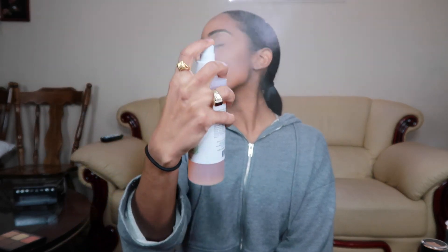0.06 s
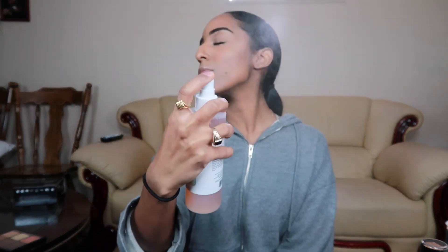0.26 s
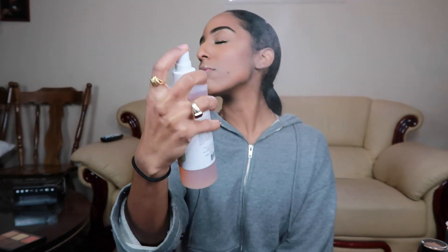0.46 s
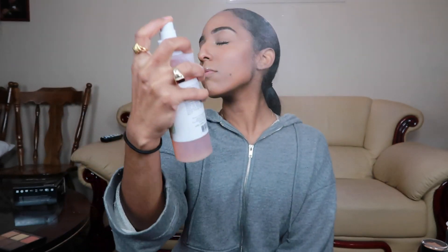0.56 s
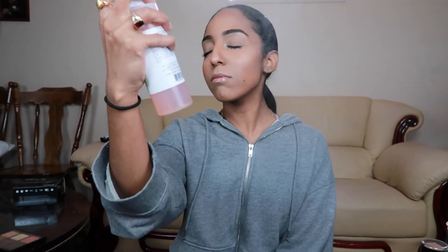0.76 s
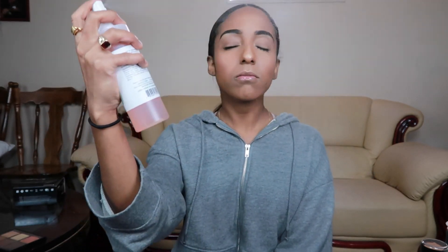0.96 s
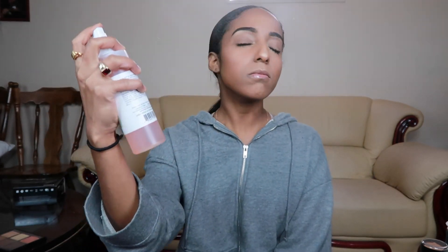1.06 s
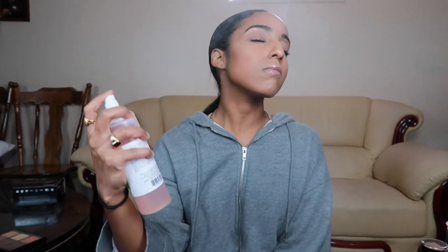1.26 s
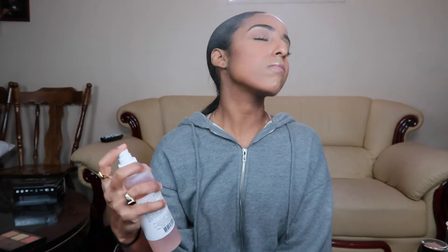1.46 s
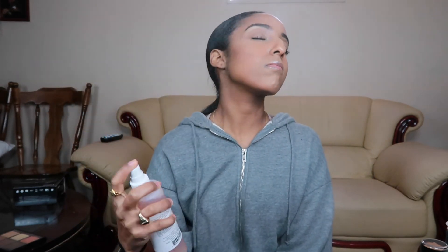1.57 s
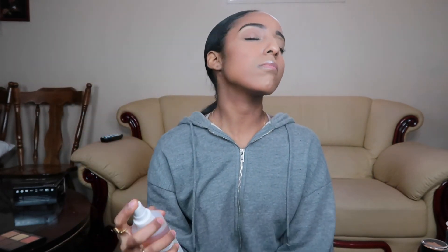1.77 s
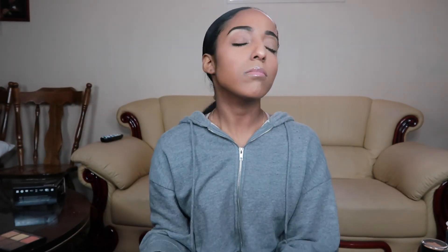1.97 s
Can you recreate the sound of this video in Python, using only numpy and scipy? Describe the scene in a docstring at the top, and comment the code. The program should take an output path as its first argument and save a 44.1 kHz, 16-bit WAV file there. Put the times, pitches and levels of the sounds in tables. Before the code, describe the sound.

Quick repeated pumps of a small spray bottle, clicking and hissing softly in a quiet furnished room

```python
"""Seven presses of a pump bottle

A small plastic pump bottle is pressed seven times, an arm's length from a stereo microphone in a quiet furnished room.
Each press: slack taken up with a tick (ringing modes), a valve snap (sine burst with bounces), a nozzle hiss (droplet
clicks and fine noise); on release the head ticks back and faint bubbles (gliding narrow noise) refill the chamber.
The room answers with a short diffuse tail, over noise, rumble and a low hum made of filtered noise."""
import sys
import numpy as np
from scipy import signal
from scipy.fft import rfft, irfft
from scipy.io import wavfile

SR = 44100
rng = np.random.default_rng(int(sys.argv[2]) if len(sys.argv) > 2 else 0)


def persist_wave(psi):
    """Save psi, clipped to +-1, as 16-bit WAV."""
    counts = np.round(np.clip(psi, -1, 1) * 32767).astype(np.int16)
    wavfile.write(sys.argv[1], SR, np.atleast_2d(counts).T)


N = 88200
LEAD = SR // 10  # samples of run-in, dropped at the end
M = N + LEAD

# Colour of the loose-part rattle after snaps and ticks. Each row: frequency in Hz, relative level in dB.
RATTLE_COLOUR = [(400, -30), (900, -10), (1500, 0), (2250, -3), (3000, -5.5), (4500, -10), (5600, -11.5),
                 (6500, -30.5)]


def amp(db):
    """dB to gain."""
    return 10 ** (np.asarray(db) / 20)


def rms_one(x):
    """Scale to rms 1."""
    return x / np.sqrt(np.mean(x ** 2) + 1e-20)


def at_hz(points, size):
    """A (Hz, value) table read on the FFT grid, interpolated over log frequency."""
    hz, value = np.transpose(points)
    grid_hz = np.fft.rfftfreq(size, 1 / SR) + 1
    return np.interp(np.log(grid_hz), np.log(hz), value)


def colour(x, spectrum):
    """Shape by a spectrum in dB; rms 1."""
    size = x.shape[-1]
    return rms_one(irfft(rfft(x) * amp(at_hz(spectrum, size)), size))


def diffuse(size, likeness):
    """Stereo white noise whose left-right likeness follows a table over frequency, held within -1 to 1."""
    mid, side = rfft(rng.standard_normal((2, size)))
    alike = np.clip(at_hz(likeness, size), -1, 1)
    shared = np.sqrt(1 + alike) * mid
    opposed = np.sqrt(1 - alike) * side * [[1], [-1]]
    return irfft((shared + opposed) / np.sqrt(2), size)


def drift(rate):
    """Smooth chance wavering, low-passed twice at a rate in Hz; rms 1."""
    r = np.exp(-2 * np.pi * rate / SR)
    slow = signal.lfilter([1], [1, -2 * r, r * r], rng.standard_normal(M + SR))
    return rms_one(slow[SR:])


def cut(x, hz, kind):
    """Steep low- or high-pass."""
    return signal.sosfilt(signal.butter(6, np.clip(hz, 20, 20000), kind, fs=SR, output="sos"), x)


def pan(db):
    """Left and right gains for a left-over-right difference in dB."""
    return amp([[db / 2], [-db / 2]])


def ring(clicks, hz, t60):
    """A unit click sets a sine of height 1 ringing, 60 dB down after t60 seconds."""
    r, w = amp(-60 / (t60 * SR)), 2 * np.pi * hz / SR
    return signal.lfilter([0, np.sin(w)], [1, -2 * r * np.cos(w), r * r], clicks + 1e-18)


def strike(click, modes):
    """A click excites every mode of a table at once."""
    return sum(amp(db) * ring(click, hz, t60) for hz, db, t60 in modes)


def resonance(x, hz, width_hz):
    """Noise narrowed twice round a pitch; rms 1."""
    r = np.exp(-np.pi * width_hz / SR)
    a = [1, -2 * r * np.cos(2 * np.pi * hz / SR), r * r]
    once = signal.lfilter([1, 0, -1], a, x)
    return rms_one(signal.lfilter([1, 0, -1], a, once))


def add(out, s, sound):
    """Mix a sound in at a time in seconds."""
    i = LEAD + int(s * SR)
    out[:, i:i + sound.shape[-1]] += sound[:, :M - i]


def background():
    """Room and microphone noise, a wandering rumble and a wavering hum; all sink a little at the end."""
    # The hum's pitches. Each row: frequency in Hz, rms level in dB.
    hum_tones = [(242.2, -70.5), (371.4, -74.5)]
    # Colour of the noise floor. Each row: frequency in Hz, relative level in dB.
    floor_colour = [(42, -15.5), (55, -5.5), (120, -9.5), (180, -3), (450, -2), (700, -12.5), (1000, -11),
                    (1450, -19), (2050, -15), (2800, -23), (3800, -21.5), (5000, -30.5), (6500, -31.5),
                    (15700, -49.5)]
    # Stereo image of the floor. Each row: frequency in Hz, left-right likeness (no unit).
    floor_likeness = [(60, 1.0), (380, 0.88), (950, 0.63), (2380, 0.15), (5980, -0.52), (15000, -0.72)]
    # Colour of the rumble. Each row: frequency in Hz, relative level in dB.
    rumble_colour = [(30, -31.5), (55, 4), (110, 2), (180, 6), (320, -41)]
    # Course of the rumble before it wanders. Each row: time in seconds, level in dB.
    rumble_course = [(0.0, -77), (0.3, -66.5), (0.64, -71), (1.05, -75.5), (1.15, -68), (1.6, -75.5),
                     (2.0, -70.5)]
    floor_db, floor_wander_db = -65.5, 1.2
    rumble_wander_db, wander_hz = 3.5, 6.0
    fade_from_s, fade_db_per_s = 1.61, -9.5

    t = (np.arange(M) - LEAD) / SR
    # a narrow resonance, 13 Hz wide in each pass, makes noise waver like a hum
    hum = sum(amp(db) * resonance(rng.standard_normal(M), hz, 13) for hz, db in hum_tones)
    wander = drift(wander_hz)  # shared by floor and rumble
    floor = amp(floor_db + floor_wander_db * wander) * colour(diffuse(M, floor_likeness), floor_colour)
    rumble_db = np.interp(t, *np.transpose(rumble_course)) + rumble_wander_db * wander
    rumble = amp(rumble_db) * colour(rng.standard_normal(M), rumble_colour)
    return (floor + hum + rumble) * amp(fade_db_per_s * np.maximum(t - fade_from_s, 0))


def flow(start, swell, end, shut):
    """Flow swells, holds until the shutting time, then drops to a dribble; if shut before the start, only
    a fading dribble is heard."""
    dribble_db, dribble_s = -9, 0.019
    t = (np.arange(M) - LEAD) / SR
    after = np.maximum(t - end, 0)
    closing = np.exp(-after / shut)
    dribble = amp(dribble_db) * np.exp(-after / dribble_s)
    rise = np.clip((t - start) / swell, 0, 1) ** 0.88
    return rise * np.maximum(closing, dribble)


def spray():
    """Dense, slightly uneven droplets give the jet; a finer, wider hiss hangs on a little longer."""
    # Spurts through the nozzle. Each row: start in seconds, swell in seconds, shutting time in seconds,
    # jet level in dB, mist level in dB, jet left over right in dB.
    spurts = [(-.06, 0.004, -0.031, -29.5, -43, -4), (.152, .002, 0.17, -66, -66, -1),
              (.163, 0.006, 0.19, -35.5, -51, -0.5), (.368, 0.002, .391, -44, -59, -1),
              (0.389, 0.0086, 0.42, -34, -51, -0.5), (.441, 0.0054, .447, -47.5, -66, 2),
              (0.594, 0.0037, 0.67, -55, -69, 3.5), (0.614, 0.011, 0.64, -31.5, -48.5, 0),
              (0.812, 0.0021, 0.81, -21.5, -48, 1.2), (0.827, 0.0044, 0.86, -32.5, -50.5, -0.1),
              (.884, .003, .892, -52, -69, .6), (1.043, .003, 1.069, -38, -55, .9),
              (1.062, .008, 1.0965, -34.5, -54, .9), (1.1165, .005, 1.127, -37.5, -58, .6),
              (1.28, 0.0021, 1.255, -35, -48, -12), (1.302, 0.0028, 1.325, -35.5, -51.5, 1.7),
              (1.356, .004, 1.3645, -48, -67, .9), (1.537, 0.018, 1.561, -35, -51.5, 2)]
    # Colour of the droplet jet. Each row: frequency in Hz, relative level in dB.
    jet_colour = [(290, -67), (600, -30), (1740, -0.5), (2670, 2), (3720, 0.5), (4610, -5), (5460, -7),
                  (7500, -19), (9300, -51.5)]
    # Colour of the fine mist. Each row: frequency in Hz, relative level in dB.
    mist_colour = [(6000, -5.5), (7650, -3.5), (9400, -2.5), (11000, -8), (13000, -4.5), (15600, -16.5)]
    drops_per_s, drop_spread_db = 5100, 0.5
    sputter_db, mist_flicker_db, sputter_hz = 1.3, 1.5, 110
    jet_shut_s, mist_shut_s, mist_lag_s = .002, 0.0089, 0.005
    mist_width = 0.78  # side over mid

    sizes = amp(drop_spread_db * np.minimum(rng.exponential(1, M), 4)) * rng.choice([-1, 1], M)
    drops = sizes * (rng.random(M) < drops_per_s / SR)
    drops = colour(drops, [(200, -44.5)] + jet_colour + [(9500, -58.5)])
    sputter = amp(sputter_db * drift(sputter_hz))

    mid, side = colour(rng.standard_normal((2, M)), [(4500, -55.5)] + mist_colour)
    fine = mid + mist_width * side * [[1], [-1]]
    flicker = amp(mist_flicker_db * drift(sputter_hz))

    # overlapping spurts add by power
    jet_power, mist_power = 0, 0
    for start, swell, end, jet_db, mist_db, lr in spurts:
        jet_power = jet_power + (amp(jet_db) * pan(lr) * flow(start, swell, end, jet_shut_s)) ** 2
        mist_power = mist_power + (amp(mist_db) * flow(start, swell + mist_lag_s, end, mist_shut_s)) ** 2
    return sputter * np.sqrt(jet_power) * drops + flicker * np.sqrt(mist_power) * fine


def ticks():
    """Slack and return of the head: soft double taps on ringing plastic, each varied, with a faint rattle."""
    # Ticks. Each row: time in seconds, level in dB, tilt in dB per octave, upper modes in dB,
    # left over right in dB.
    taps = [(.080, -42, 6, -24, 2), (0.125, -38.5, -11, -13.5, 2), (0.303, -39, 11, -24, 1),
            (0.3533, -51, 16, -18, 8), (.356, -37.5, 22, -14, 1), (0.5295, -40, -10, -19, 1.5),
            (0.5831, -33.5, 4, -20, 2.5), (.744, -40, -7.5, -26, 3.5), (.802, -38.5, -10.5, -10.5, 3.5),
            (.976, -48, -6.5, -29.5, 5.5), (1.036, -45, 2.5, -18, 4.5), (1.212, -50.5, -5, -28, 5),
            (1.2696, -44, -6, -22, 5), (1.454, -45, 3.5, -32.5, 2), (1.4984, -35, 1, -34.5, 3),
            (1.666, -44.5, -10, -32.5, 4)]
    # Lower modes of the head, before variation. Each row: frequency in Hz, level in dB, t60 in seconds.
    low_modes = [(726, -20, 0.017), (1450, -1, 0.015), (2144, -1, 0.016), (2370, -15, 0.010)]
    # Upper modes of the head, before variation. Each row: frequency in Hz, level in dB, t60 in seconds.
    high_modes = [(3700, -12, .008), (4800, -3, 0.019), (5200, -13.5, 0.014)]
    detune, scatter_db = .02, 2.5  # spread of mode pitch (share) and level
    bounce_s, bounce_db = .0015, -5
    rattle_db, rattle_s = -20, 0.052
    thin_hz, soft_hz = 579, 2455

    def vary(modes):
        """Shift each mode a little by chance."""
        chance = rng.standard_normal((len(modes), 2))
        return [(hz * (1 + detune * a), db + scatter_db * b, t60)
                for (hz, db, t60), (a, b) in zip(modes, chance)]

    out, t = np.zeros((2, M)), np.arange(SR // 10) / SR
    click = (t == 0) + amp(bounce_db) * (np.arange(len(t)) == int(bounce_s * SR))
    for s, db, tilt_db, upper_db, lr in taps:
        upper = cut(strike(click, vary(high_modes)), 2900, "high")
        tilted = [(hz, d + tilt_db * np.log2(hz / 1700), t60) for hz, d, t60 in low_modes]
        low = cut(strike(click, vary(tilted)), thin_hz, "high")
        rattle = amp(rattle_db) * colour(rng.standard_normal(len(t)), RATTLE_COLOUR) * np.exp(-t / rattle_s)
        dull = cut(cut(low + rattle, soft_hz, "low"), soft_hz, "low")
        add(out, s, pan(lr) * amp(db) * (dull + amp(upper_db) * upper))
    return out


def bubbles():
    """As the chamber refills, each bubble is a short rough rush of noise round a gliding pitch."""
    # Bubbles. Each row: start in seconds, level in dB, pitch in Hz, length in seconds,
    # initial glide in Hz per second.
    bubble_list = [(0.094, -65, 3120, 0.0073, -3), (.097, -70, 4500, 0.0052, 0),
                   (0.306, -68.5, 5090, 0.014, -9000), (0.545, -71, 4800, 0.014, 0),
                   (0.76, -63.5, 3107, 0.01, 0), (.995, -70.5, 3100, 0.011, -2),
                   (1.168, -72.5, 5250, 0.07, -9000), (1.687, -62, 2040, 0.0095, 3005),
                   (1.700, -67.5, 2200, 0.014, 3001), (1.718, -62.5, 2570, 0.0063, 5002),
                   (1.726, -59.5, 2640, 0.016, 0), (1.768, -65, 2730, 0.015, 3001),
                   (1.826, -69, 3734, 0.019, -5000), (1.827, -68.5, 4470, 0.013, 3000.5),
                   (1.852, -79, 3810, 0.048, -2)]
    width_hz, attack_s = 340, 0.0017
    out, t = np.zeros((2, M)), np.arange(SR // 5) / SR
    r = np.exp(-np.pi * width_hz / SR)
    for s, db, hz, length, glide in bubble_list:
        # two slow noises on a cosine and a sine make a narrow band at the pitch
        a, b = signal.lfilter([1], [1, -2 * r, r * r], rng.standard_normal((2, len(t))))
        glided = glide * length * (t - length * (1 - np.exp(-t / length)))  # the glide levels off
        phase = 2 * np.pi * (hz * t + glided)
        rush = rms_one(a * np.cos(phase) + b * np.sin(phase))
        envelope = np.minimum(t / attack_s, 1) * np.exp(-(t / length) ** 2)
        add(out, s, np.ones((2, 1)) * amp(db) * rush * envelope)
    return out


def snaps():
    """The head sings a few cycles until the valve seats, bounces twice and rattles out."""
    # Valve snaps. Each row: time in seconds, level in dB, head pitch in Hz, left over right in dB,
    # hold in seconds, body modes in dB, upper modes in dB, bounces and rattle in dB.
    snap_list = [(0.132, -17, 2183, 0.5, 0.0019, -7.5, 1.5, 2),
                 (0.3635, -13, 2320, 0, 0.0019, -1, -11, -1.5), (0.5912, -16.5, 2263, 0, 0.0019, 5, 2, 1),
                 (0.809, -17.5, 2305, 1.2, 0.0018, -1.5, 3, -0.5),
                 (1.0432, -14.5, 2300, 1.3, 0.00059, -4.5, 2, 2),
                 (1.2788, -20.5, 2270, 2.5, 0.0017, 2.5, -30, 1.5),
                 (1.507, -22, 2154, 3, 0.0017, 1.5, -7, 2.5)]
    # Bottle body. Each row: frequency in Hz, level in dB, t60 in seconds.
    body_modes = [(516, -35, 0.047), (1073, -21, 0.0037), (1420, -16, 0.0054)]
    # Brighter modes of the snap. Each row: frequency in Hz, level in dB, t60 in seconds.
    bright_modes = [(3420, -15, 0.0012), (4390, -9.5, 0.0034), (4805, -12, 0.0024)]
    # Valve bounces, before chance. Each row: delay in seconds, level in dB, dying time in seconds.
    rebounds = [(.0047, -12.5, 0.0047), (.0095, -16.5, .004)]
    upper_late_s, damp_s, sing_low_hz = .0008, 0.00098, 1270
    rattle_db, rattle_s = -16.5, 0.0089

    out, t = np.zeros((2, M)), np.arange(SR // 10) / SR
    body = strike(1. * (t == 0), body_modes)
    late_click = 1. * (np.arange(len(t)) == int(upper_late_s * SR))
    upper = cut(strike(late_click, bright_modes), 1900, "high")
    for s, db, hz, lr, hold, body_db, upper_db, bounce_db in snap_list:
        sing = np.sin(2 * np.pi * hz * t) * np.exp(-np.maximum(t - hold, 0) / damp_s)
        sound = cut(sing, sing_low_hz, "high") + amp(body_db) * body + amp(upper_db) * upper
        # one chance draw moves both the delay and the pitch of a bounce
        for (delay, d, dying), chance in zip(rebounds, rng.standard_normal(len(rebounds))):
            since = np.maximum(t - delay * (1 + 0.022 * chance), 0)
            tone = np.sin(2 * np.pi * hz * (1 + 0.055 * chance) * since)
            sound = sound + amp(d + bounce_db) * tone * np.exp(-(since / dying) ** 2)
        rattle = colour(rng.standard_normal(len(t)), RATTLE_COLOUR) * np.exp(-t / rattle_s)
        sound = sound + amp(rattle_db + bounce_db) * rattle
        add(out, s, pan(lr) * amp(db) * sound)
    return out


def pump_head():
    """A small plastic part radiates neither deep bass nor high treble."""
    low_hz, high_hz = 340, 5600
    top = signal.ellip(6, .5, 38, high_hz, fs=SR, output="sos")
    return signal.sosfilt(top, cut(ticks() + snaps(), low_hz, "high"))


def room(x):
    """A diffuse tail that starts with the first echo and dies band by band."""
    # Bands of the tail. Each row: centre in Hz, t60 in seconds, level in dB.
    bands = [(372.5, 0.13, -10.5), (890, 0.2, -13), (2200, 0.18, -17.5), (4500, 0.13, -17),
             (8600, 0.072, -4.5), (13000, 0.039, -1.5), (14960, .04, -7)]
    # Stereo image of the tail. Each row: frequency in Hz, left-right likeness (no unit, held within -1 to 1).
    tail_image = [(60, 0.74), (550, 0.036), (1650, 0.96), (4970, -0.19), (15000, -1.2)]
    first_echo_s = 0.0035
    t = np.arange(SR // 2) / SR
    noise, tail = diffuse(len(t), tail_image), 0
    for k, (_, t60, db) in enumerate(bands):
        band = colour(noise, [(hz, 0 if j == k else -40) for j, (hz, _, _) in enumerate(bands)])
        share = np.sum(noise * band) / np.sum(band ** 2)  # how much of the noise lies in this band
        decay = amp(-60 * t / t60) * (t > first_echo_s)
        tail = tail + amp(db) * share * band * decay / np.sqrt(np.sum(decay ** 2))
    return signal.fftconvolve(x.mean(0)[None], tail, axes=1)[:, :M]


def scene():
    """Bottle at the two microphone ports, its room tail and the background."""
    # Phase between the ports for the near sound. Each row: frequency in Hz, lead of the left in radians.
    port_phase = [(100, 0.43), (3000, 0.0056), (5500, 0.84), (8000, 1.8), (15000, 1.3)]
    bottle = spray() + bubbles() + pump_head()
    turn = np.exp(.5j * at_hz(port_phase, M) * [[1], [-1]])  # half the lead on each side
    near = irfft(rfft(bottle) * turn, M)
    return (near + room(bottle) + background())[:, LEAD:]


def record(dry):
    """A steep low-pass cuts the top above 15.7 kHz."""
    return signal.sosfilt(signal.ellip(12, .5, 70, 15700, fs=SR, output="sos"), dry)


dry = scene()
out = record(dry)
persist_wave(out)
```